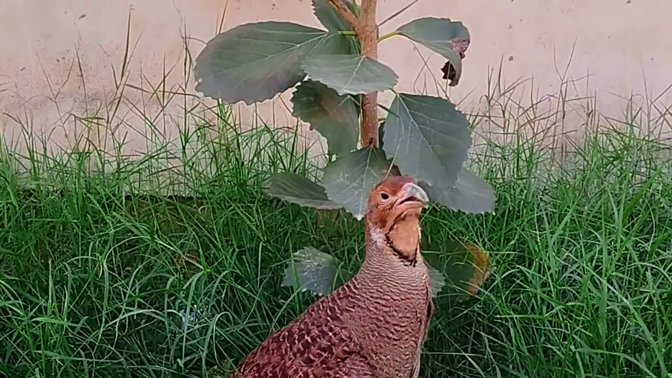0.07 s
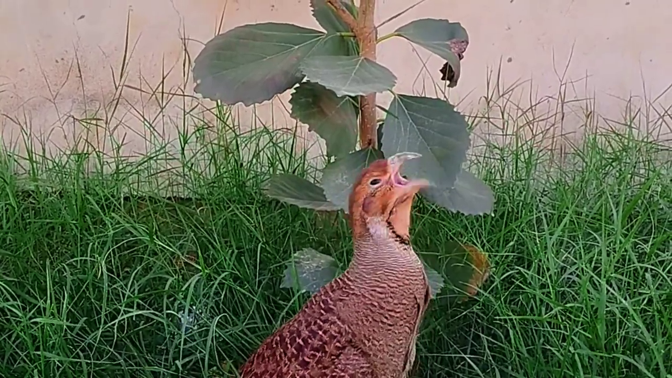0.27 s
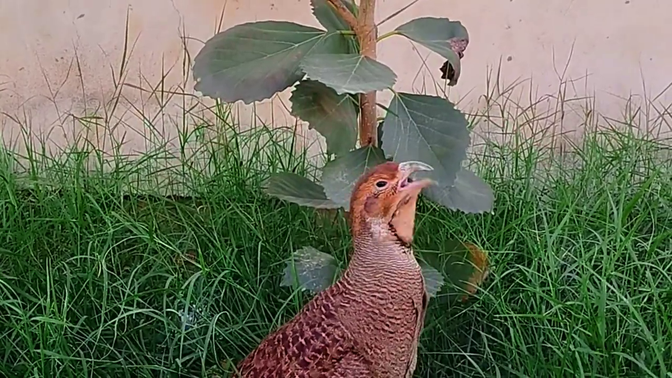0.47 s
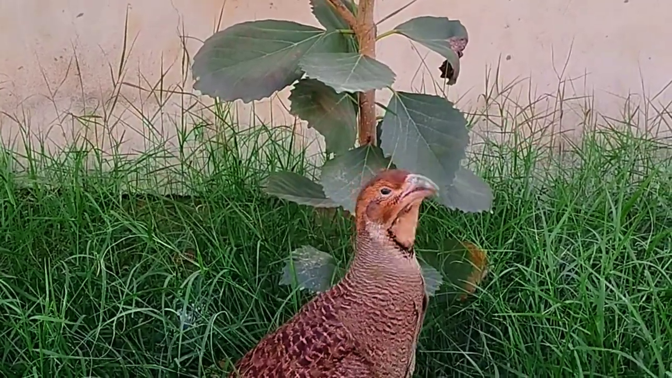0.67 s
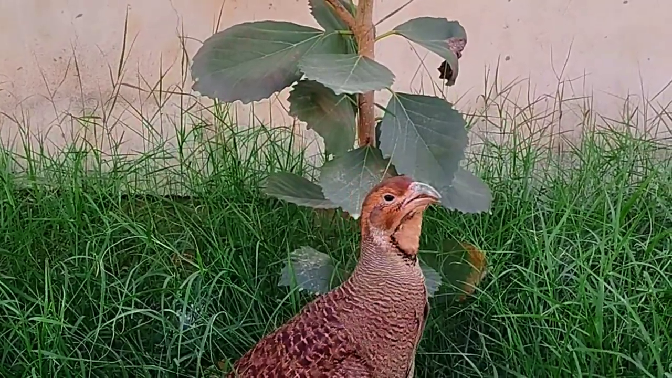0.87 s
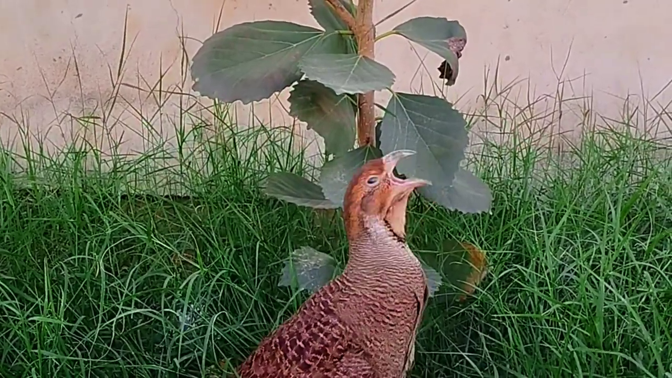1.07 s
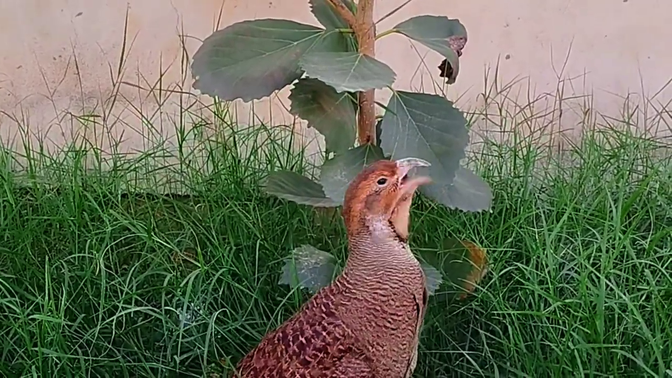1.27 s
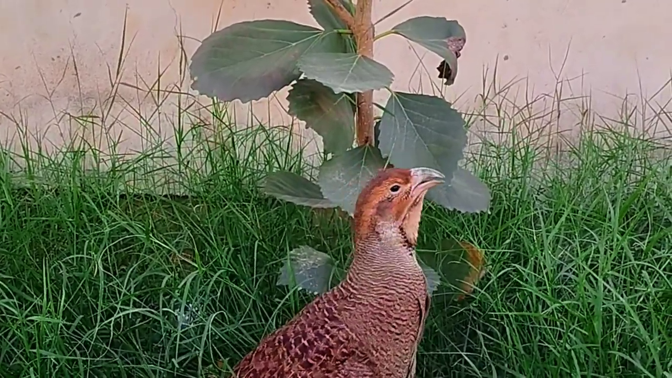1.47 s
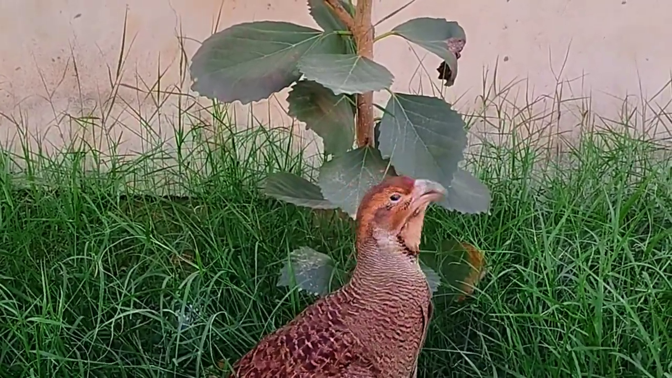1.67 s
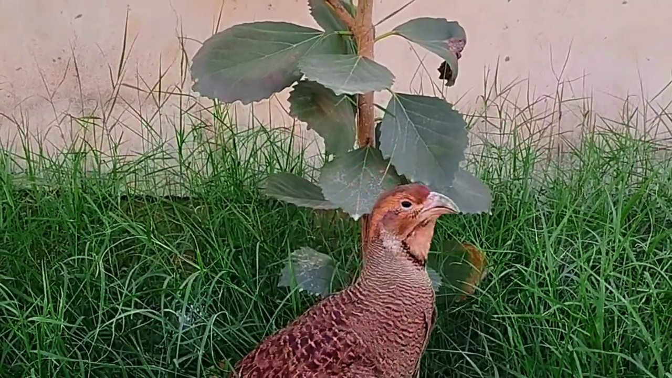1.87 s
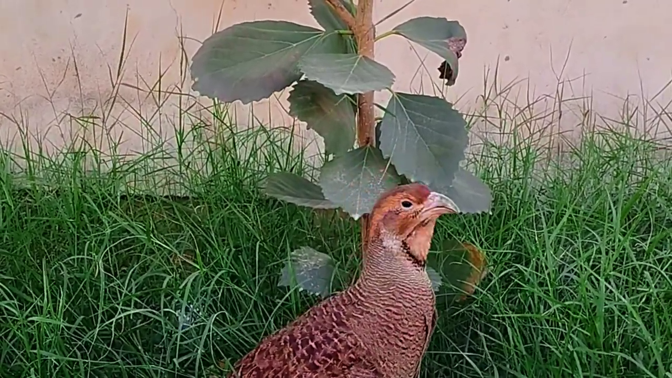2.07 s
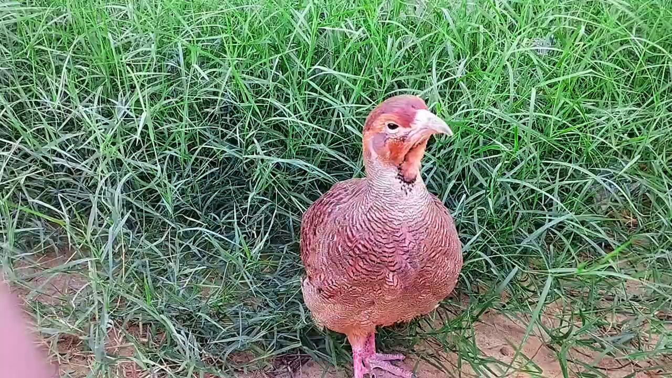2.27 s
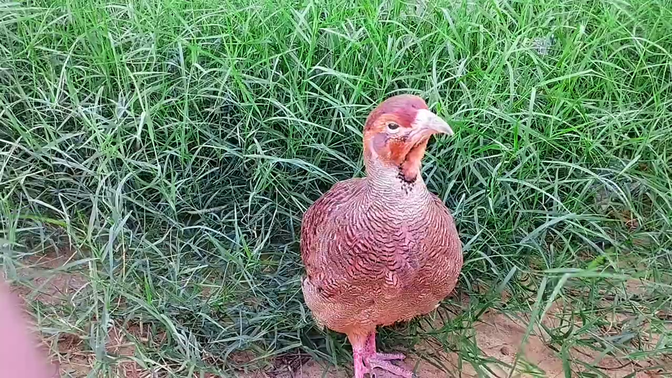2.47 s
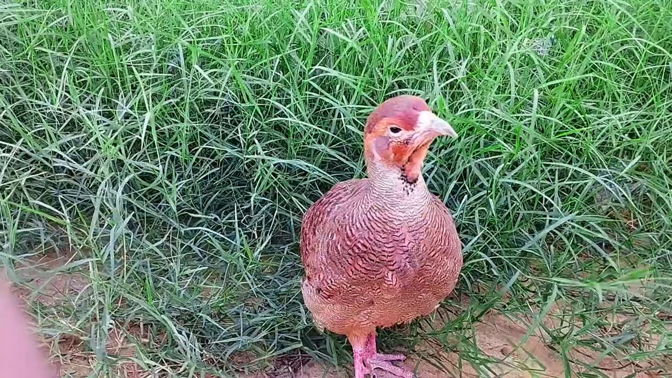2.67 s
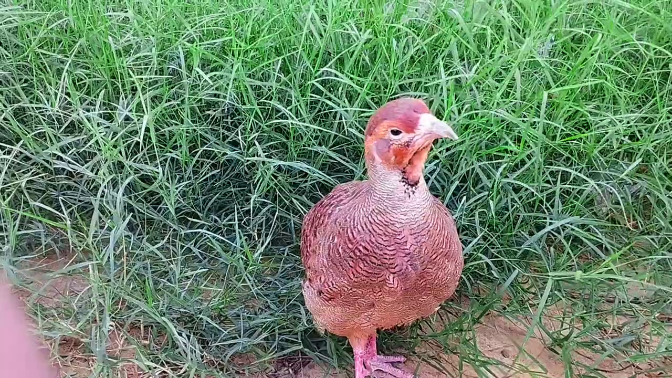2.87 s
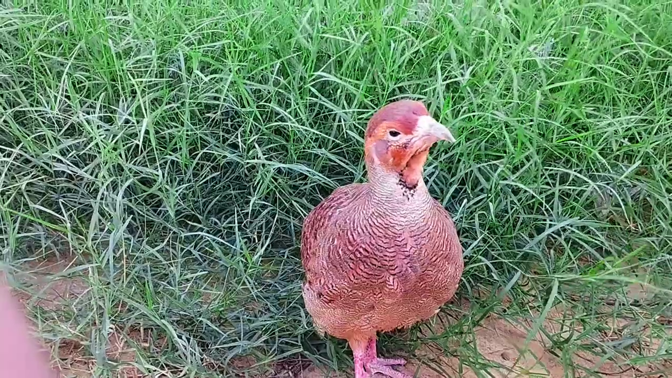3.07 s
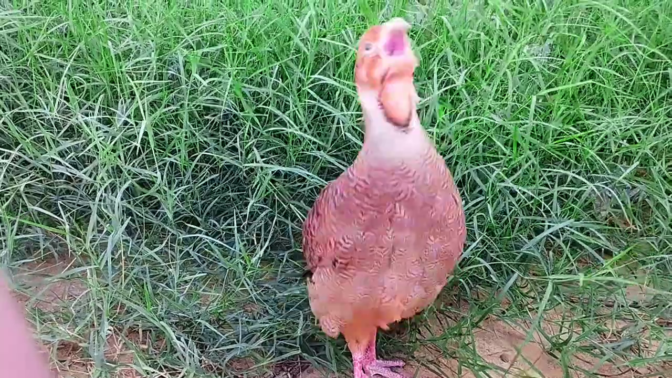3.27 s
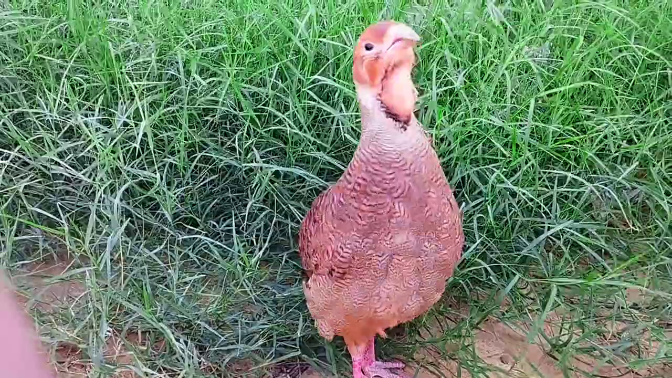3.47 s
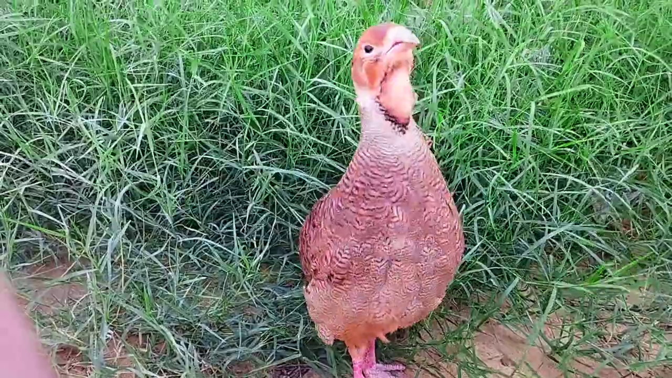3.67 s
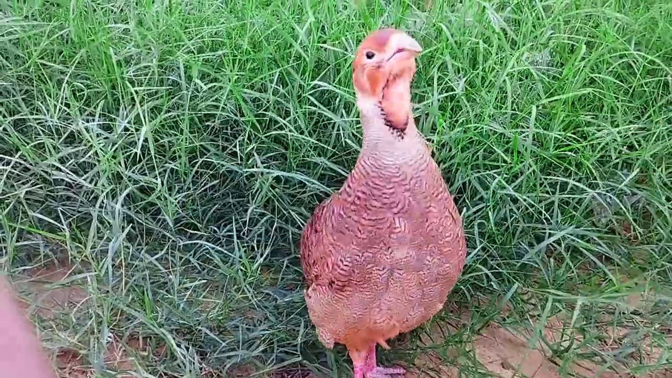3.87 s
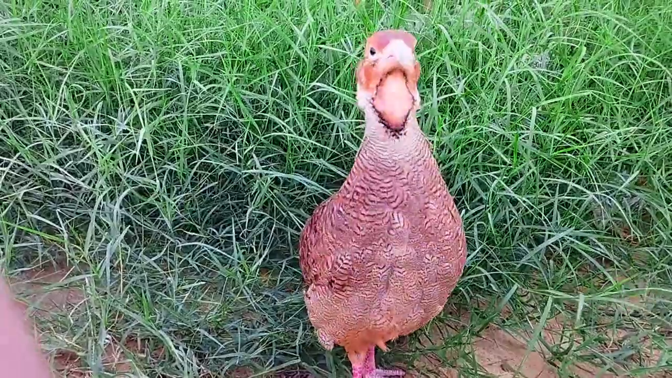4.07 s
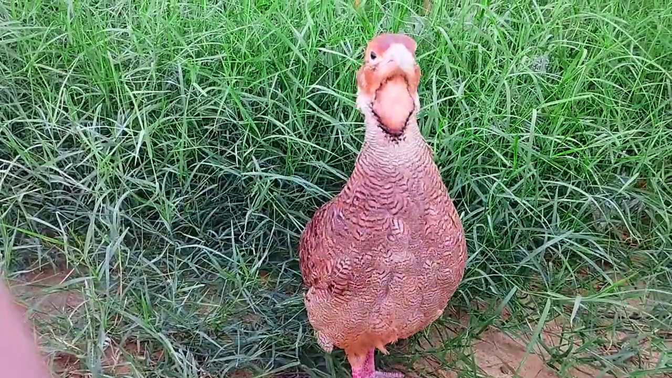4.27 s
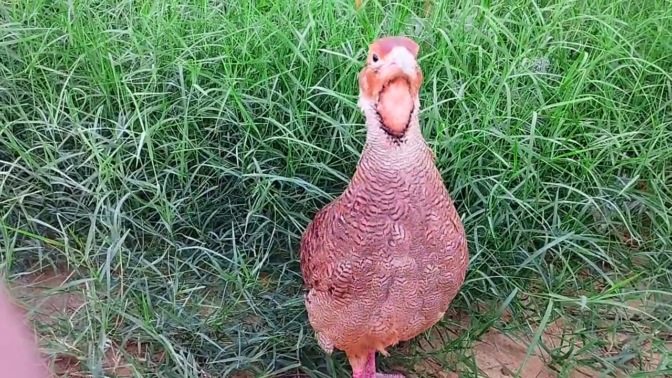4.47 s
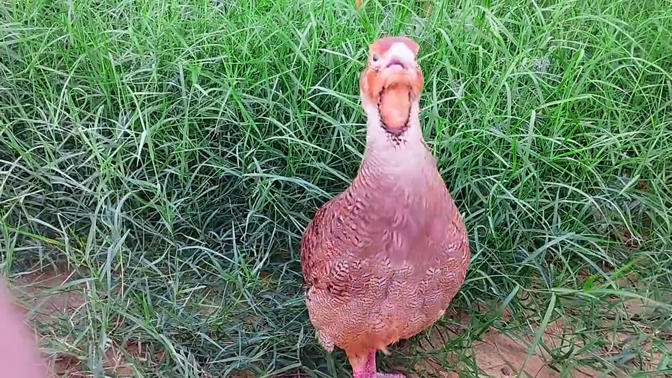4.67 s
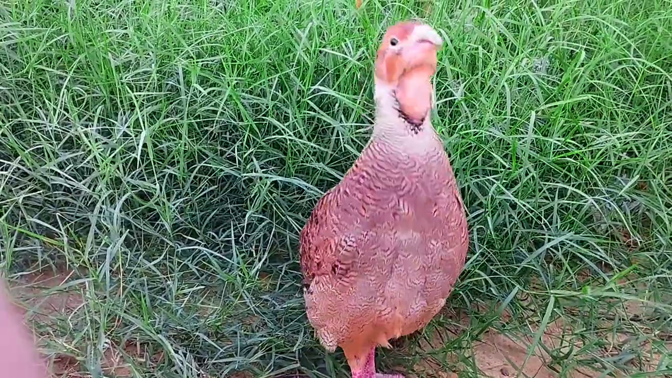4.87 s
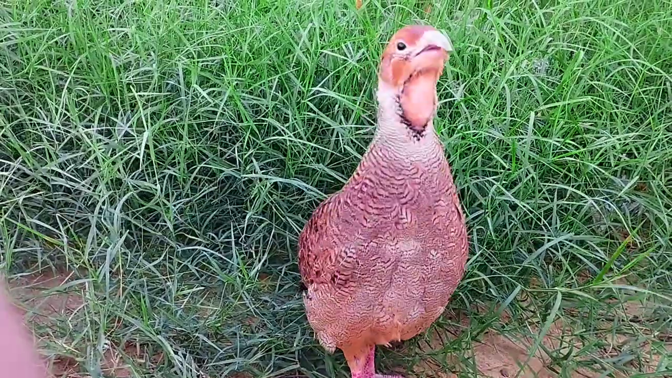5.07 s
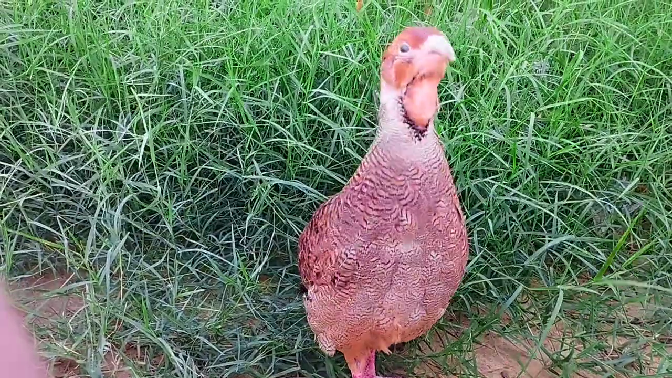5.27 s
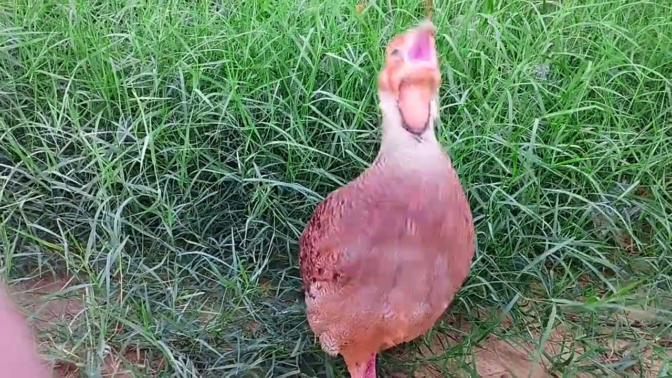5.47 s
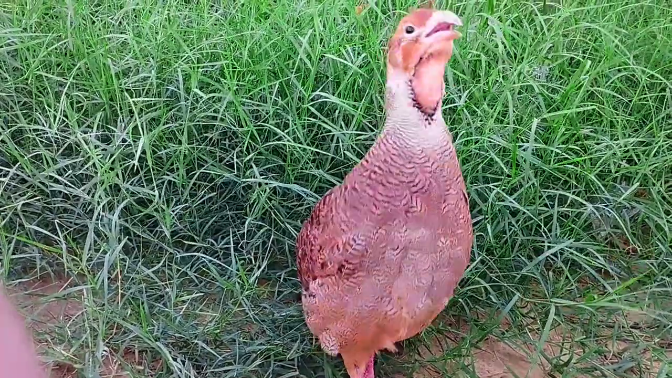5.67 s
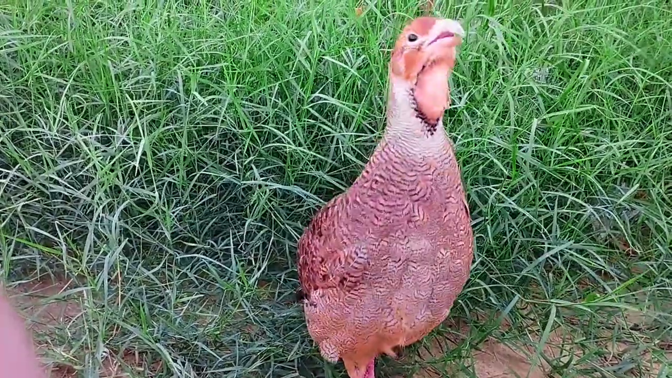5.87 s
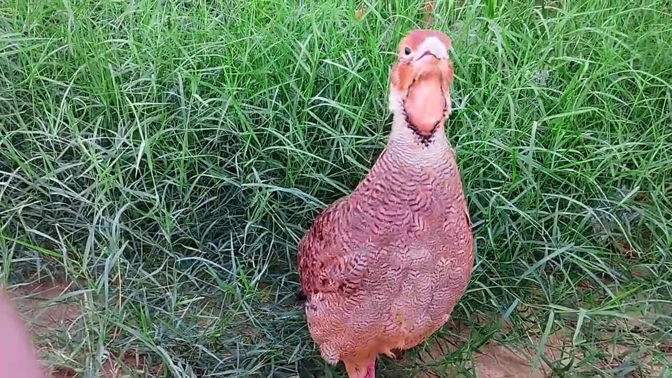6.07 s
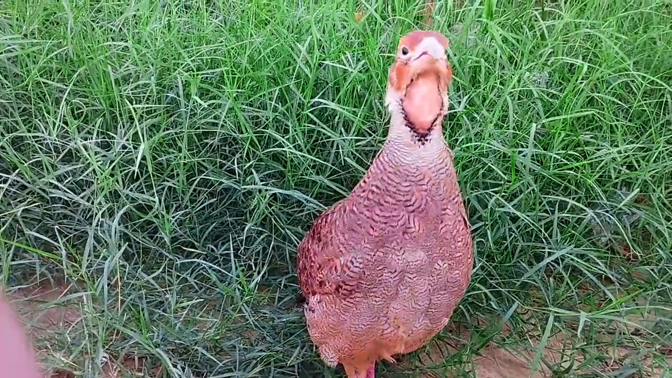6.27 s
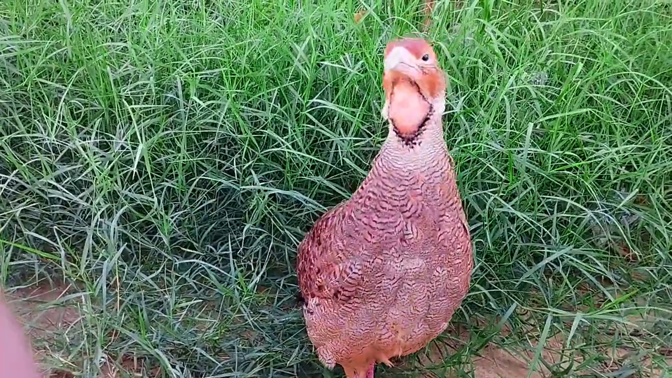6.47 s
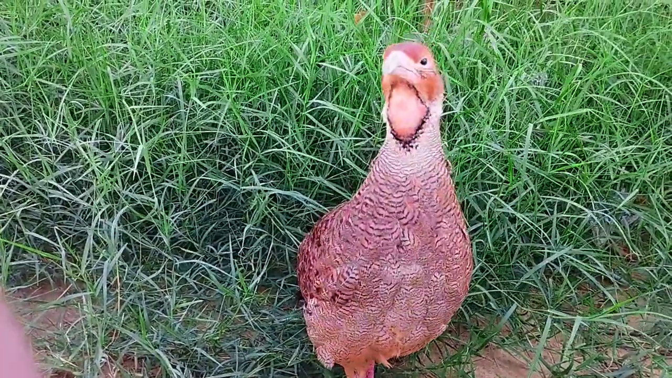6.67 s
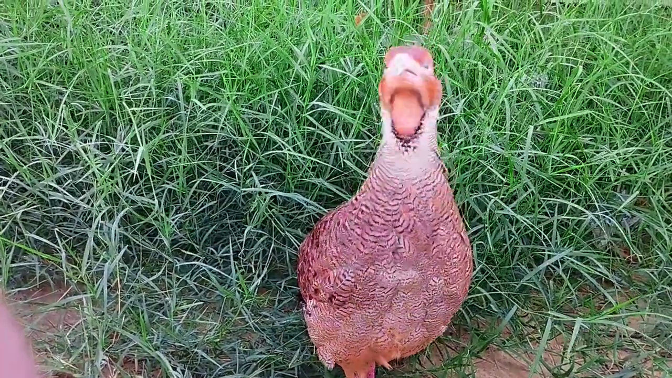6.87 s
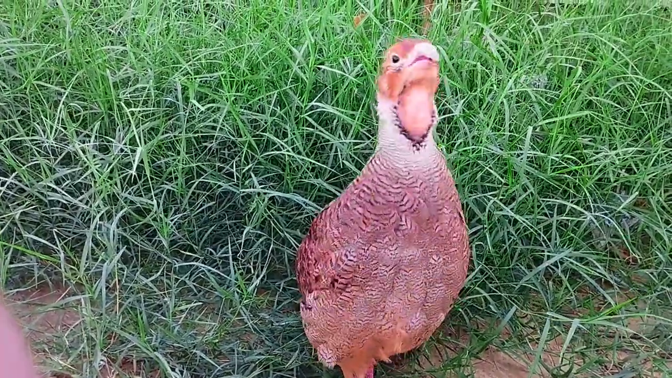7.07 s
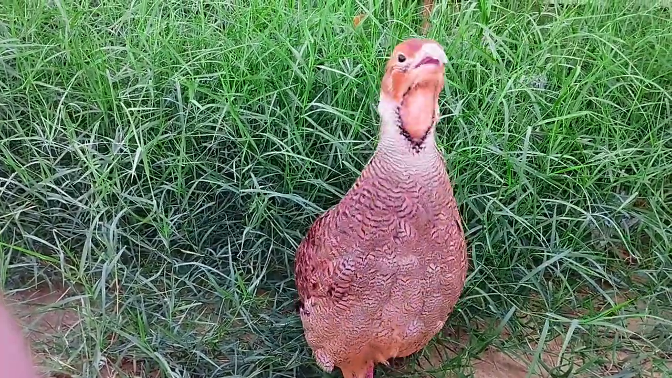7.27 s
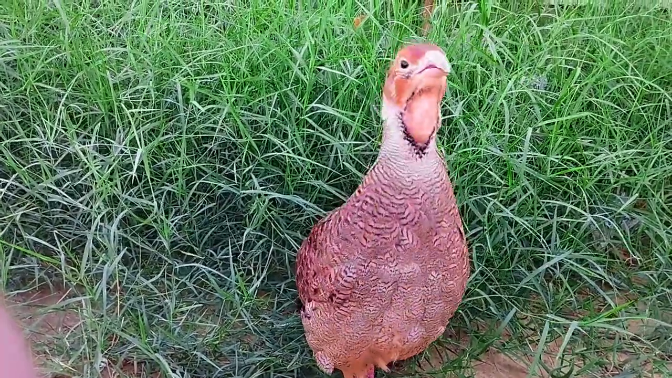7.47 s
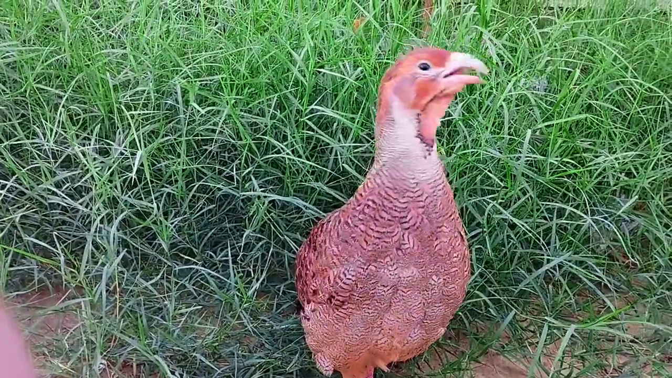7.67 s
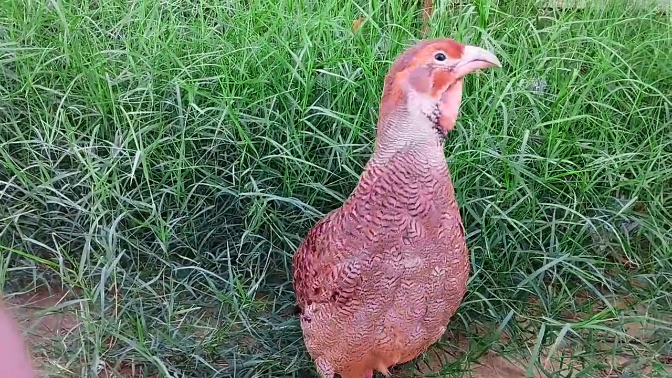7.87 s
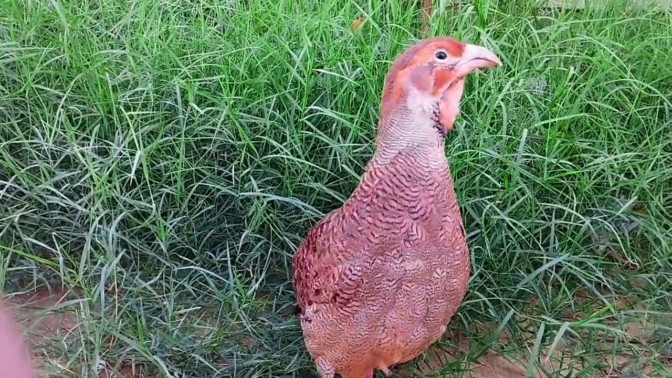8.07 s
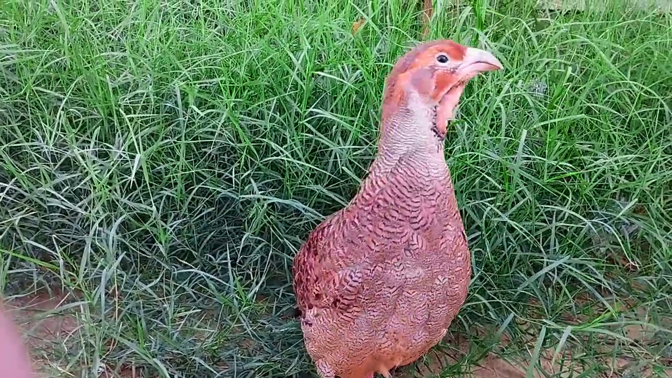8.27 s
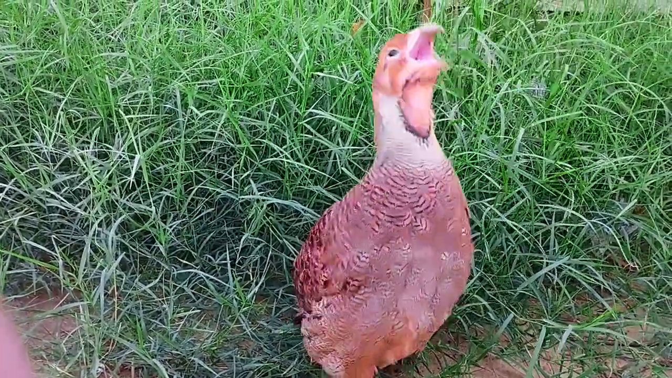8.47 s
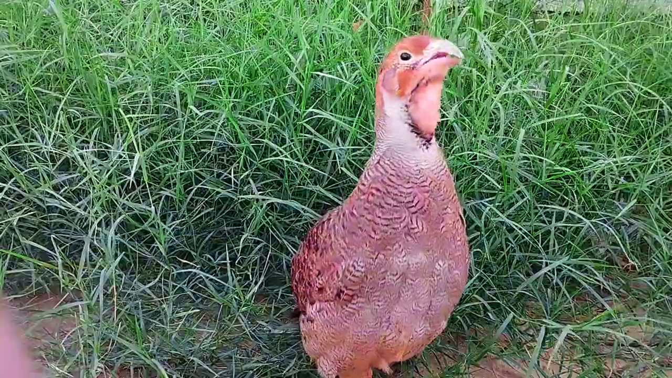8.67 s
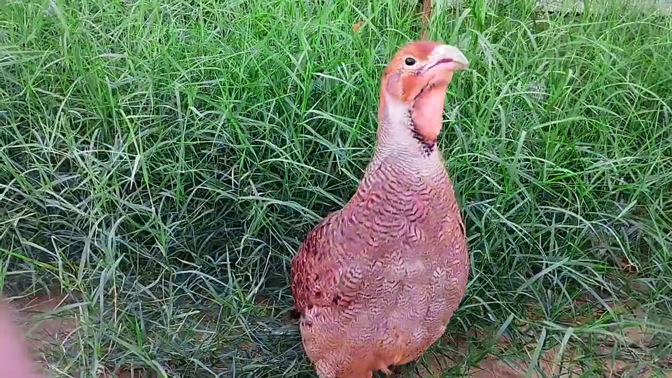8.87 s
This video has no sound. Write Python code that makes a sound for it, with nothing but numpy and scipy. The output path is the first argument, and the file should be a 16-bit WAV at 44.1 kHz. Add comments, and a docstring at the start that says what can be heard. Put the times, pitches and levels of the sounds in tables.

```python
"""A rising whistle over throaty clucks opens the scene: grey francolins calling beside a garden wall.
A second voice answers in harsh three-part cries and fading runs of clucks; after a short silence both
call from open grass. Whistles are gliding sines; the other voice is a noisy pulse train that snaps into
clear notes. Coloured noise makes the rumble, wind and thud, and sines a faint hum by the wall.
Two microphone ports hear it all; distance is not modelled, the tables set how loud each call is."""
import sys
import numpy as np
from scipy import signal
from scipy.fft import rfft, irfft
from scipy.io import wavfile
from scipy.ndimage import uniform_filter1d, minimum_filter1d

SR = 44100
rng = np.random.default_rng(int(sys.argv[2]) if len(sys.argv) > 2 else 0)


def file_out(sig):
    """Save sig as 16-bit WAV at sys.argv[1]."""
    # one column per channel
    cols = np.atleast_2d(sig).T
    # limit, then scale
    lim = np.clip(cols, -1, 1)
    pcm = np.round(lim * 32767).astype(np.int16)
    wavfile.write(sys.argv[1], SR, pcm)


N = 393372
TIME = np.arange(N) / SR
BINS = np.fft.rfftfreq(N, 1 / SR)
WALL_END, GRASS_START = 2.279, 2.379  # s, with silence between the two places


def gain_of(db):
    """Decibels to amplitude."""
    return 10 ** (np.asarray(db) / 20)


def evened(x):
    """Scales to rms 1."""
    return x / np.sqrt(np.mean(x ** 2) + 1e-20)


def read(points, hz, axis=1):
    """One column of a spectrum table, joined on a log-frequency axis."""
    columns = np.transpose(points)
    return np.interp(np.log(hz + 1), np.log(columns[0] + 1), columns[axis])


def colour(x, points):
    """Filters by a spectrum table; rms 1."""
    gains = gain_of(read(points, np.fft.rfftfreq(len(x), 1 / SR)))
    return evened(irfft(rfft(x) * gains, len(x)))


def lowpass(order, hz):
    """Butterworth sections that pass what lies below hz."""
    return signal.butter(order, hz, fs=SR, output="sos")


def wander(t, hz):
    """Smooth chance of rms 1, little of it faster than hz."""
    noise = rng.standard_normal(len(t) + SR // 10)  # the extra 0.1 s lets the filter settle
    return evened(signal.sosfilt(lowpass(2, hz), noise)[-len(t):])


def fade(t, start, end, edge):
    """A gate with soft edges of the given length, centred on start and end."""
    nearest = np.minimum(t - start, end - t)
    return np.sin(np.pi / 2 * np.clip(nearest / edge + .5, 0, 1)) ** 2


def add(mix, s, sound):
    """Adds a sound to the mix at time s."""
    start = round(s * SR)
    sound = sound[max(-start, 0):]
    part = mix[max(start, 0):][:len(sound)]
    part += sound[:len(part)]


# Whistles: (time [s], length [s], level [dB], attack [s], release [s],
# pitch at the start without the scoop [Hz], climb [Hz/s])
WHISTLES = [(0.0, 0.25, -5, 0.028, 0.042, 2428, 1430), (0.764, 0.28, -8, 0.019, 0.089, 2440, 981),
            (1.533, 0.25, -8, 0.0059, 0.053, 2437, 1189), (3.06, 0.2, -2.5, 0.092, 0.031, 2361, 2032),
            (3.798, 0.21, -3, 0.077, 0.033, 2407, 1805), (4.604, 0.2, 0, 0.074, .05, 2400, 2354),
            (5.308, 0.22, -3, 0.056, 0.038, 2383, 2250), (6.041, 0.24, -4.5, 0.061, 0.054, 2350, 2426),
            (6.814, 0.23, -4, 0.044, .065, 2380, 2240), (7.522, 0.22, -4, 0.044, 0.033, 2414, 2000),
            (8.24, 0.22, -3, 0.044, 0.026, 2404, 1831)]
# Colour of the whistle's hiss in each place: (frequency [Hz], relative level [dB])
HISS_WALL = [(1000, -1), (2600, 7.5), (7000, -6)]
HISS_GRASS = [(1100, -5), (1450, 3), (2200, 10), (6300, 2), (8000, -3), (9400, 11), (11200, -2), (15500, 3)]
BREATH_DB, BREATH_S = -25.5, 0.016  # weak breathy sound at the ends, and how quickly it dies outside them
SCOOP_HZ, SCOOP_S, SCOOP_DB = 85, 0.041, -2  # starts this flat, settles in this time, fainter while flat
WAVER_DB, BEND = 1.1, .003  # slow unsteadiness of level, and of pitch as a share


def whistle(s, length, level_db, attack, release, pitch_hz, climb):
    """A nearly pure tone swells from a breathy start and climbs steadily; a hiss follows its strength."""
    t = np.arange(-.035, length + 0.15, 1 / SR)
    inside = np.clip(t, 0, length)
    swell = (1 - np.exp(-inside / attack)) * np.minimum((length - inside) / release, 1)
    breath = gain_of(BREATH_DB) * np.exp(-abs(t - inside) / BREATH_S)
    flat = np.clip(1 - t / SCOOP_S, 0, 2)
    unsteady_db = SCOOP_DB * np.minimum(flat, 1) + WAVER_DB * wander(t, 28)
    level = gain_of(level_db) * (swell + breath) * gain_of(unsteady_db)
    pitch = pitch_hz + climb * inside - SCOOP_HZ * flat
    waver = .002 * wander(t, 70) + BEND * wander(t, 16)
    phase = 2 * np.pi * np.cumsum(pitch * (1 + waver)) / SR
    # the tone is hoarse while it is weak and steadies as it swells
    hoarse = np.minimum(.024 / level, .7) * wander(t, 320)
    tone = (np.sin(phase) + gain_of(-38.0) * np.sin(2 * phase)) * (1 + hoarse)
    spectrum, hiss_db = (HISS_WALL, -35) if s < WALL_END else (HISS_GRASS, -31)
    hiss = gain_of(hiss_db) * colour(rng.standard_normal(len(t)), spectrum)
    gate = fade(t, t[0] + 0.0034, t[-1] - .003, 0.0043)
    return s + t[0], (level * tone + np.sqrt(level) * hiss) * gate


# Colour of the rasp in each place: (frequency [Hz], relative level [dB])
RASP_WALL = [(500, -47.5), (1100, -10), (1700, -2), (3000, -10), (4200, -13.5), (5500, -1.5), (7000, -17.5),
             (14000, -19)]
RASP_GRASS = [(200, -16.5), (340, -6.5), (500, -19), (680, -2.5), (900, -4), (1150, -0.5), (1400, -3.5),
              (1850, 8.5), (2300, -1), (3600, -5.5), (4600, -3.5), (6400, -5), (8000, -13), (15000, -9)]
BODY_HZ, BODY_HZ_PER_DB = 2240, 36  # top of a rasp's body at 0 dB, and how it sinks with less effort


def rasp(s, level_db, pitch, shape, jitter, breathy, harsh_db, thirds=0):
    """The syrinx vibrates unsteadily: cycles vary in length and strength, and air rushes through."""
    at, swell_db, bend = np.transpose(shape)
    t = np.arange(0, at[-1], 1 / SR)
    effort_db = level_db + np.interp(t, at, swell_db)
    hz = pitch * np.interp(t, at, bend)
    # a cluck steadies a little as the push eases
    wild = 1 - .45 * thirds * fade(t / t[-1], .62, 2, .3)
    phase = 2 * np.pi * np.cumsum(hz * (1 + jitter * wild * wander(t, 600))) / SR
    # strong and weak cycles alternate, which puts lines between the harmonics
    flutter = 1 + .5 * np.cos(phase / 2) + .4 * wander(t, 450)
    # in a cluck every third cycle stands out too, which gives it a low throaty body
    third = np.cos(phase / 3 + 2 * np.pi * rng.random())
    two_thirds = np.cos(2 * phase / 3 + 2 * np.pi * rng.random())
    flutter += thirds * (third + two_thirds)
    flutter = (1 + wild * (flutter - 1)) * gain_of(3 * (1 - thirds) * wander(t, 130))
    slope = .5 + 0.52 * thirds
    buzz = sum(np.sin(k * phase + 2 * np.pi * rng.random()) / k ** slope for k in range(1, 7))
    drive = flutter * (evened(buzz) + breathy * rng.standard_normal(len(t)))
    voice = colour(drive, RASP_WALL if s < WALL_END else RASP_GRASS)
    # a soft rasp is rounder: the treble falls away faster than the body
    body_top_hz = max(BODY_HZ + BODY_HZ_PER_DB * level_db, 900)
    body = signal.sosfiltfilt(lowpass(4, body_top_hz), voice)
    bright = gain_of(np.clip(1.016 * effort_db + harsh_db, -27, 5))
    bright *= fade(t, 0, t[-1], 0.014)  # the treble comes last and leaves first
    sound = gain_of(effort_db) * evened(body + bright * (voice - body))
    return s, sound * fade(t, .001, 1, .002) * fade(t, -1, t[-1] - .004, .008)


# Length [s]; level lost at the ends [dB]; share of pitch lost there; skew, under 1 peaks late or early
CLUCK_S, CLUCK_EDGE_DB, CLUCK_BEND, CLUCK_SKEW = 0.0602, -13, 0.28, .85  # this skew peaks early


def cluck_arch():
    """Level and pitch rise and fall together: (time [s], level [dB], factor on the pitch)."""
    u = np.linspace(0, 1, 25)
    slack = 1 - np.sin(np.pi * u ** CLUCK_SKEW)
    return np.transpose([u * CLUCK_S, CLUCK_EDGE_DB * slack, 1 - CLUCK_BEND * slack])


# Runs of clucks: (time [s], number of clucks, first gap [s], first level [dB])
RUNS = [(0.0, 2, .11, -18), (.517, 4, 0.12, -14), (1.323, 5, 0.12, -15), (1.87, 3, .116, -28),
        (3.489, 4, 0.1, -19.5), (4.029, 1, 0.032, -28), (4.163, 2, 0.11, -32.5), (5.008, 2, 0.11, -15.5),
        (5.23, 2, 0.1, -20), (5.763, 5, 0.12, -13), (6.304, 1, 0, -25.5), (6.419, 2, .12, -28),
        (7.218, 2, 0.12, -14.5), (7.442, 2, .11, -19.5), (7.795, 1, 0, -21.5), (7.966, 2, 0.12, -29.5),
        (8.673, 3, 0.11, -15)]
QUICKEN_S, TIRE_DB = 0.0054, 2.5  # each gap of a run is this much shorter, each cluck this much softer


def cluck_times():
    """Each run quickens and fades: (time [s], level [dB]) of every cluck."""
    for s, count, gap, level_db in RUNS:
        for k in range(round(count)):
            yield s + k * gap - QUICKEN_S * k * (k - 1) / 2, level_db - TIRE_DB * k


# Cluck pitch by place: (pitch at 0 dB [Hz], lift [dB of pitch per dB of level])
CLUCK_HZ = {"wall": (1587, .08), "grass": (1564, .17)}


def clucks(rough):
    """Short throaty rasps on an arching pitch; a harder cluck is a higher one."""
    for s, level_db in cluck_times():
        top_hz, lift = CLUCK_HZ["wall" if s < WALL_END else "grass"]
        pitch = top_hz * gain_of(lift * level_db)
        add(rough, *rasp(s, level_db, pitch, cluck_arch(), jitter=.1, breathy=.22, harsh_db=8, thirds=0.72))


def air(spectrum, width=.3):
    """Gently swelling outdoor rumble, nearly alike in both ports."""
    mid, side = (colour(rng.standard_normal(N), spectrum) for _ in range(2))
    return np.array([mid + width * side, mid - width * side]) * gain_of(2 * wander(TIME, 6.4))


# Background by the wall: (frequency [Hz], relative density [dB per Hz])
AIR_WALL = [(25, -5), (120, 2.5), (220, -10.5), (500, -12), (900, -27), (8000, -51.5)]


def wall_air():
    """Rumble beside the wall: coloured noise at one base level."""
    return gain_of(-33.5) * air(AIR_WALL)


# Faint hum by the wall: (frequency [Hz], level before the overall trim [dB])
HUM = [(96.9, -37.5), (694.4, -56)]


def hum(level_db=-3, waver=0.21):
    """A few steady low tones whose strength wavers slightly."""
    total = np.zeros(N)
    for hz, db in HUM:
        strength = gain_of(db) * (1 + waver * wander(TIME, 4.5))
        total += strength * np.sin(2 * np.pi * (hz * TIME + rng.random()))
    return gain_of(level_db) * total


GUST_AT_S, GUST_S, GUST_DB = 2.1, 0.42, 21.5  # one gust, this far above the light buffeting
BUFFET_DB, BUFFET_HZ = -49.5, 65


def buffets():
    """Light wind rumbles on each microphone port separately, in lumps, with one gust."""
    gust_db = GUST_DB * fade(TIME, GUST_AT_S, GUST_AT_S + GUST_S, .05)
    level_db = BUFFET_DB + 3 * wander(TIME, 2) + gust_db
    return gain_of(level_db) * np.array([wander(TIME, BUFFET_HZ) for _ in range(2)])


# Overtones of a clear note: (frequency where one falls [Hz], level against the note before a tilt [dB])
OVERTONES_WALL = [(2800, -32), (3700, -22.5), (5500, -15), (7000, -28.5)]
OVERTONES_GRASS = [(3600, -33.5), (4400, -17.5), (5300, -23.5), (6500, -20.5), (7200, -28)]
HOOK_HZ, HOOK_S, HELD_SLIDE_HZ = 130, .002, 160  # pitch hooks at a note's ends, and how quickly they pass
HELD_S, HELD_SAG_HZ = .032, 40.4  # the held middle note of a cry


def note(s, length, level_db, first_hz, last_hz, overtones_db=0):
    """The syrinx locks into one clean vibration, shaky at its ends, with a few overtones."""
    t = np.arange(-.004, length + 0.00049, 1 / SR)
    glide = first_hz + (last_hz - first_hz) * fade(t, length / 2, 1, length)
    sag = 1 - glide / glide.max()  # below its top pitch a note turns ragged and loses overtones
    shake = .004 + .04 * (1 - fade(t, .003, length - .003, .005)) + .3 * sag
    # a short note arches up from below, a held one drops onto its pitch; both droop as they end
    slide_hz = HELD_SLIDE_HZ if length == HELD_S else -HOOK_HZ
    droop = HOOK_HZ * np.exp((t - length) / HOOK_S)
    hooks = slide_hz * np.exp(-np.maximum(t, 0) / HOOK_S) - droop
    phase = 2 * np.pi * np.cumsum((glide + hooks) * (1 + shake * wander(t, 630))) / SR
    table = OVERTONES_WALL if s < WALL_END else OVERTONES_GRASS
    upper = np.zeros(len(t))
    for k in range(2, 5):
        tilted_db = read(table, k * glide.mean()) - 7.5 * (k - 3.5)
        upper += gain_of(tilted_db) * np.sin(k * phase)
    tone = np.sin(phase) + gain_of(overtones_db - 38 * sag) * upper
    pressure = (glide / glide.mean()) ** 5 * (1 + 2 * sag * wander(t, 220))  # loudness sags with pitch
    return s + t[0], np.sqrt(2) * gain_of(level_db) * pressure * tone * fade(t, 0, length, 0.0068)


# Falling squeals that some clucks break into: (time [s], level [dB], first pitch [Hz])
SQUEALS = [(0.024, -16, 1388), (0.536, -10.5, 1737), (0.564, -21.5, 1472), (0.679, -16, 1389),
           (0.79, -19, 1360), (1.341, -13, 1694), (1.364, -18, 1472), (1.472, -19, 1476),
           (2.913, -42.5, 839), (3.508, -20.5, 1232), (5.033, -15, 1291), (5.778, -13.5, 1632),
           (6.021, -16, 1275), (7.247, -20, 1255), (7.821, -22, 977), (8.701, -17.5, 1372)]
SQUEAL_S, SQUEAL_FALL_HZ, SQUEAL_OVERTONES_DB = .024, 237, -4


def squeal_notes():
    """A squeal is one clear note that only falls: yields the arguments of note()."""
    for s, level_db, hz in SQUEALS:
        yield s, SQUEAL_S, level_db, hz, hz - SQUEAL_FALL_HZ, SQUEAL_OVERTONES_DB


# Three-part cries: (time of the held note [s], rasp level [dB], opening level [dB], opening pitch [Hz],
# held level [dB], held pitch [Hz], closing level [dB], closing pitch [Hz], closing length [s],
# closing fall [Hz])
CRIES = [(0.294, -11.5, -19.5, 2286, -2, 1840, -15.5, 2329, .042, 195.2),
         (1.099, -12, -11.5, 2400, -3, 1835, -16, 2308, .039, 161.7),
         (3.29, -11.5, -16.5, 1900, -4.5, 1762, -15.5, 1775, .024, 454.6),
         (4.818, -13, -23, 1902, 0, 1790, -15.5, 1812, .027, 539.6),
         (5.566, -12.5, -2, 1766, 1, 1820, -17.5, 2285, .035, 231.6),
         (7.04, -12.5, -8.5, 1704, -1, 1777, -16, 1800, .022, 524.5),
         (8.486, -11, -2.5, 1722, 5, 1801, -18, 2280, .022, 197)]
# Course of a cry's rasp: (time [s], level [dB], factor on the pitch)
CRY_SHAPE = [(0, -15.5, 0.9), (.013, -4.5, 1.1), (.035, -7.5, 1), (0.096, -12.5, 0.93), (.114, -16, 1.05),
             (.15, -16.5, .95), (0.169, -22.5, 0.82)]
CRY_LEAD_S, CRY_TAIL_S = .05, 0.015  # rasp starts before the held note, breaks off after the closing one
CLOSING_AFTER_S = .052  # from the start of the held note


def cries(rough):
    """The rasp under each three-part cry, cut off soon after the closing note."""
    for s, level_db, *_, close_s, _ in CRIES:
        start, cry = rasp(s - CRY_LEAD_S, level_db, 890, CRY_SHAPE, jitter=.08, breathy=.65, harsh_db=26)
        end = s + CLOSING_AFTER_S + close_s + CRY_TAIL_S
        add(rough, start, cry * fade(start + TIME[:len(cry)], -1, end, 0.017))


OPENING_LEAD_S, OPENING_S, OPENING_RISE_HZ = .041, .016, 87
DIP_LEAD_S, DIP_S, DIP_DB = 0.018, 0.025, -29  # a soft dip an octave under the held note


def cry_notes():
    """A cry rises, dips, holds and falls: yields the arguments of note()."""
    for s, _, open_db, open_hz, held_db, held_hz, close_db, close_hz, close_s, fall_hz in CRIES:
        half_rise, half_sag = OPENING_RISE_HZ / 2, HELD_SAG_HZ / 2
        yield s - OPENING_LEAD_S, OPENING_S, open_db, open_hz - half_rise, open_hz + half_rise
        yield s - DIP_LEAD_S, DIP_S, held_db + DIP_DB, held_hz / 2, held_hz / 2
        yield s, HELD_S, held_db, held_hz + half_sag, held_hz - half_sag
        yield s + CLOSING_AFTER_S, close_s, close_db, close_hz, close_hz - fall_hz


# Background in open grass: (frequency [Hz], relative density [dB per Hz])
AIR_GRASS = [(35, 0.5), (70, 4), (135, 0), (200, -7), (380, -11), (520, -21.5), (800, -27), (4200, -45),
             (8000, -59.5)]
# Its course: (time [s], level [dB])
BREEZE = [(2.4, -42), (2.65, -34), (5.2, -33), (5.75, -35.5), (8.9, -33)]


def grass_air():
    """Rumble in the open grass: coloured noise that follows the level table."""
    return gain_of(np.interp(TIME, *np.transpose(BREEZE))) * air(AIR_GRASS)


# Yelps: (time [s], level [dB])
YELPS = [(3.981, -22.5), (7.719, -21)]


def yelps(rough):
    """Cries broken off after their first part, all rasp."""
    for s, level_db in YELPS:
        add(rough, *rasp(s, level_db, 890, CRY_SHAPE[:3], jitter=.13, breathy=.9, harsh_db=26))


# Colour of the thud: (frequency [Hz], relative level [dB])
THUD = [(120, -24), (230, 0.5), (380, 7), (600, -56)]
THUD_AT_S, THUD_DB, THUD_RISE_S, THUD_DECAY_S = 7.184, -23, 0.0079, 0.026


def thud():
    """One soft low thud: a burst of low noise that dies away."""
    out = np.zeros(N)
    t = np.arange(0, 6 * THUD_DECAY_S, 1 / SR)
    swell = np.minimum(t / THUD_RISE_S, 1) * np.exp(-t / THUD_DECAY_S)
    add(out, THUD_AT_S, gain_of(THUD_DB) * swell * colour(rng.standard_normal(len(t)), THUD))
    return out


def birds():
    """Both voices; the rasp gives way wherever a clear note takes over."""
    rough, clear, locked = np.zeros((3, N))
    for row in WHISTLES:
        add(clear, *whistle(*row))
    clucks(rough)
    cries(rough)
    yelps(rough)
    for row in [*squeal_notes(), *cry_notes()]:
        add(clear, *note(*row))
        add(locked, row[0], signal.windows.tukey(round(row[1] * SR), .3))
    return clear + rough * gain_of(-6 * locked)


def scattered(x, taps, level_db):
    """Convolves with a separate noise tail for each port, scaled to the given level."""
    taps = taps * gain_of(level_db) / np.linalg.norm(taps[0])
    return signal.fftconvolve(x[None], taps, axes=1)[:, :N]


def garden(x, t60=0.86, tail_db=-35):
    """A faint dull tail from the surroundings."""
    taps = rng.standard_normal((2, SR)) * gain_of(-60 * TIME[:SR] / t60)
    return scattered(signal.sosfilt(lowpass(2, 4500), x), taps, tail_db)


def scatter(x, t60=0.0014, level_db=-7, above_hz=6000):
    """Grass and leaves scatter the treble, differently for each port."""
    taps = rng.standard_normal((2, SR // 10)) * gain_of(-60 * TIME[:SR // 10] / t60)
    treble = signal.sosfilt(signal.butter(4, above_hz, "high", fs=SR, output="sos"), x)
    return scattered(treble, taps, level_db)


# How the birds reach the two microphone ports:
# (frequency [Hz], left minus right [dB], left lead [rad])
PORTS_WALL = [(1185, 6, .3), (1835, 5.5, 1.3), (2600, -12, 1.9), (2617, 1, 1.85), (5400, 1, 1.7)]
PORTS_GRASS = [(993, -0.5, 0.6), (1800, -5, 1.2), (2680, -0.1, 0.27), (5250, -1, 1.94), (9400, 9, 2.3),
               (12600, -1, 0.79)]


def ports(x, table):
    """Two microphone ports hear each pitch with their own level and phase."""
    ratio = gain_of(read(table, BINS)) * np.exp(1j * read(table, BINS, axis=2))
    pair = np.array([np.sqrt(ratio), 1 / np.sqrt(ratio)])
    return irfft(rfft(x) * pair / abs(pair.mean(0)), N)  # the mean of the ports keeps the level


def scene():
    """The birds by the wall, a short silence, then the birds in the grass."""
    voices = birds()
    around = garden(voices) + scatter(voices) + buffets()
    wall = ports(voices, PORTS_WALL) + around + wall_air() + hum()
    grass = ports(voices, PORTS_GRASS) + around + thud() + grass_air()
    return wall * fade(TIME, -1, WALL_END, 0.00097) + grass * fade(TIME, GRASS_START, 10, 0.0045)


EDGE_HZ = 16100  # upper band limit


def record(dry):
    """A fast limiter holds the loudest notes under full scale; then the band limit."""
    allowed = .96 / np.maximum(abs(dry).max(0), .96)
    held = dry * uniform_filter1d(minimum_filter1d(allowed, size=301), size=151)
    band = signal.firwin(511, EDGE_HZ, window="blackman", fs=SR)
    return signal.oaconvolve(held, band[None], "same")


dry = scene()
out = record(dry)
file_out(out)
```